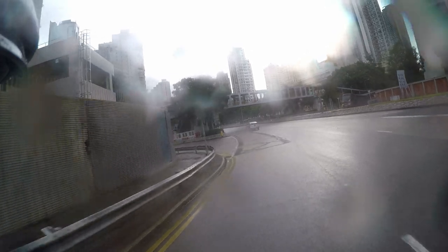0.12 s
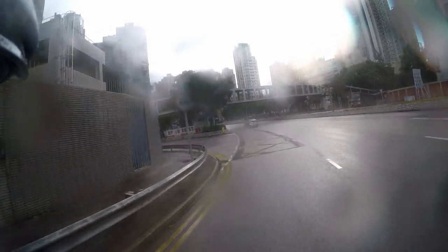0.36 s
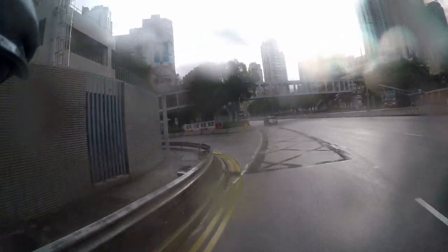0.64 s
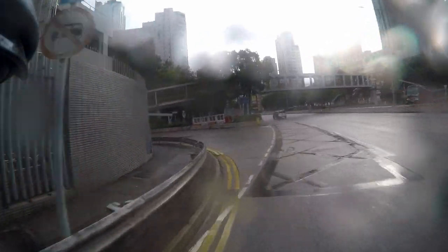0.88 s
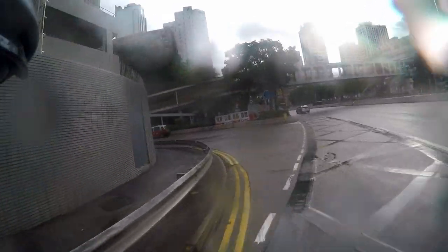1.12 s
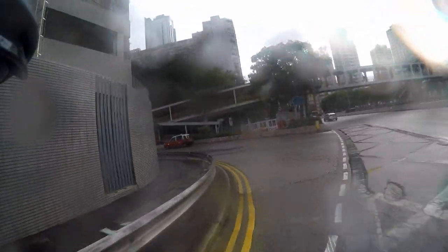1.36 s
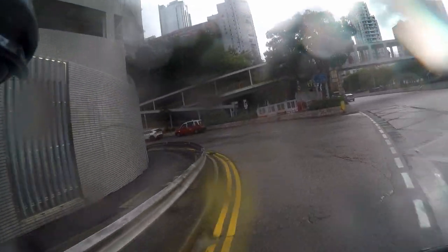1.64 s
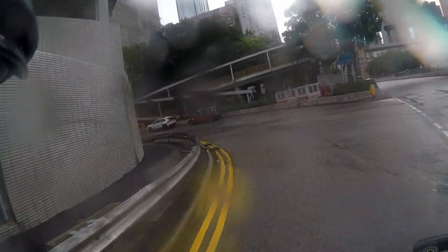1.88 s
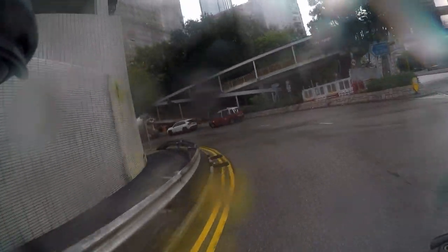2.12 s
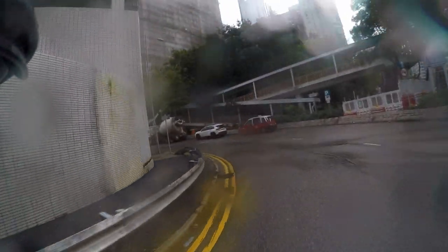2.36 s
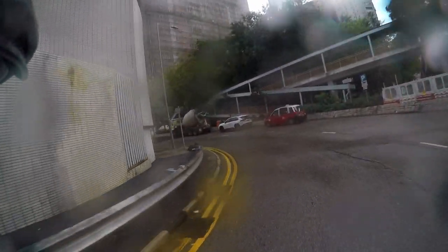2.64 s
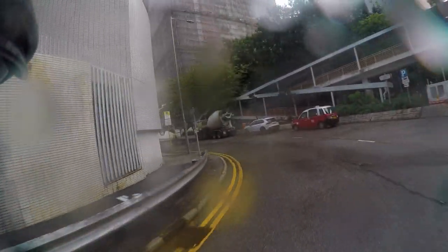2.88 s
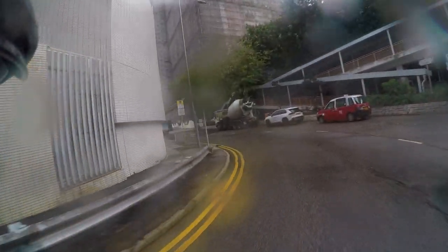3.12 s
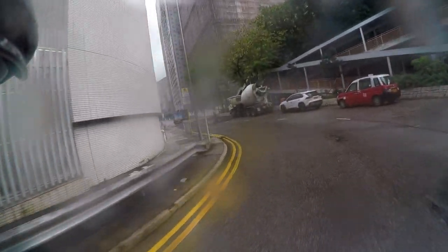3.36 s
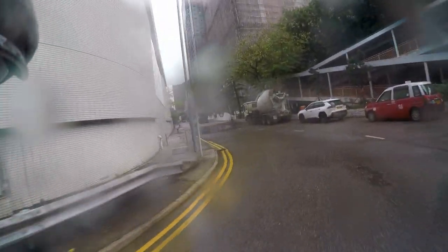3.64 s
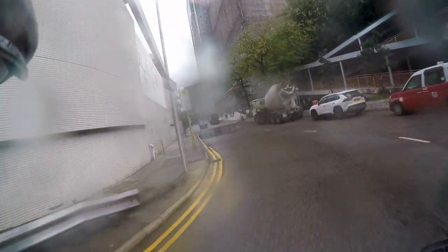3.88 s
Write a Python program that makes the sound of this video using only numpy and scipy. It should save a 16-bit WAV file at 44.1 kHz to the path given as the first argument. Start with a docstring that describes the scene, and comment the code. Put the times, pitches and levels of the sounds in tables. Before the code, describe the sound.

A scooter engine putters down a wet bend, then opens up and pulls amid tyre hiss.

```python
"""A single-cylinder scooter coasts down a wet bend, then the throttle opens and it pulls: filtered firing pulses.
Tyre spray, made of random droplets on noise, hisses through the resonances of the microphone's housing.
Coloured noise gives a steady road roar; low noise and decaying swings give wind buffeting the port.
Raindrops on the case are clicks with short rings; sparse random clicks add a faint treble crackle."""
import sys
import numpy as np
from scipy import signal
from scipy.fft import rfft, irfft
from scipy.io import wavfile

SR = 44100
rng = np.random.default_rng(int(sys.argv[2]) if len(sys.argv) > 2 else 0)


def waveform_to_disk(signal):
    """Save audio, clipped to [-1, 1], as 16-bit WAV at the path in sys.argv[1]."""
    frames = np.transpose(np.atleast_2d(signal))
    scaled = np.clip(frames, -1, 1) * 32767
    samples = np.round(scaled).astype(np.int16)
    wavfile.write(sys.argv[1], SR, samples)


def volts_from_db(level):
    """Convert decibel levels to linear amplitude ratios."""
    exponent = np.asarray(level, float) / 20
    return 10 ** exponent


N = 176400

# firing rate of the engine: (time [s], rate [firings per s])
FIRING_RATE = [(0.0, 33.5), (0.13, 32.3), (0.47, 31.95), (0.71, 31.05), (0.99, 30.71), (1.5, 29.98),
               (1.75, 29.1), (2.15, 28.51), (2.51, 28.39), (2.61, 31.52), (2.8, 35.27), (3.0, 38.2),
               (3.25, 40.14), (3.5, 40.43), (3.75, 41.36), (4.0, 40.9)]
# soft puffs on a closed throttle: (time [s], level before the extra ring [dB], extra pipe ring [dB])
COASTING = [(0, -27.5, -8.5), (.6, -27, -3), (1.2, -30, 4.5), (1.8, -29, 3.5), (2.54, -30, 2)]
# hard pulses on an open throttle: (time [s], level [dB], share of the labouring tone [0-1])
PULLING = [(2.55, -25.5, 0.89), (2.7, -24, 0.64), (2.85, -26, 0.19), (3.0, -24.5, 0.23),
           (3.25, -23.5, 0.16), (3.5, -24.5, 0.13), (4.0, -24, 0)]
# what exhaust and frame pass of a soft puff: (frequency [Hz], gain [dB])
COAST_BODY = [(20, -29), (60, -4.5), (93, 3), (125, -2), (160, -12), (185, -18), (228, -6.5), (260, -20),
              (290, -25.5), (400, -35)]
# what the exhaust passes of a hard pulse: (frequency [Hz], gain [dB])
PULL_BODY = [(40, -9), (80, -4), (125, -9), (165, -1.5), (205, -1), (245, 4), (285, -8), (328, -13.5),
             (410, -13.5), (450, -23), (495, -9.5), (570, -18), (615, -12), (655, -32.5), (705, -7.5),
             (780, -26.5), (830, -13), (900, -37.5)]
# what the exhaust passes while the engine labours at low revs: (frequency [Hz], gain [dB])
LABOUR_BODY = [(20, -38), (70, -11.5), (110, 2), (170, -1.5), (225, -6.5), (270, -10.5), (320, -10.5),
               (400, -22), (520, -39), (680, -16), (850, -44)]
# point that closes every exhaust body at the top: (frequency [Hz], gain [dB])
BODY_END = (5000, -130)
# tyre spray: (time [s], level [dB])
SPRAY = [(0.0, -31.5), (0.03, -28), (0.04, -42.5), (0.05, -31), (0.09, -41), (0.1, -28.5), (0.15, -41),
         (0.18, -32.5), (0.23, -42.5), (0.24, -32.5), (0.28, -29.5), (0.44, -40), (0.46, -35),
         (0.54, -31.5), (0.56, -44.5), (0.61, -33), (0.73, -32), (0.79, -47.5), (0.81, -32.5), (0.82, -48),
         (0.93, -55), (1.07, -43.5), (1.09, -33), (1.19, -29), (1.41, -34), (1.43, -29.5), (1.82, -31.5),
         (1.86, -35), (3.12, -34.5), (3.17, -40.5), (3.25, -34.5), (3.39, -39), (3.6, -35.5), (4.0, -39.5)]
# tone of the spray before the housing: (frequency [Hz], relative density [dB per Hz])
SPRAY_COLOUR = [(410, -59), (700, -7.5), (1060, -13.5), (2050, -4.5), (2770, -1), (3190, -0.5),
                (4130, -10.5), (5290, -23), (7310, -21.5), (8110, -36), (15500, -72)]
# lower splash in deeper water: (time [s], level relative to the spray [dB])
SPLASH = [(0, -7), (.3, -4), (.5, 2), (.6, -9.5), (1.1, -45), (1.8, -13), (2.1, -3.5), (2.6, -9.5),
          (4, -0.5)]
# tone of the splash before the housing: (frequency [Hz], relative density [dB per Hz])
SPLASH_COLOUR = [(400, -8), (800, 2.5), (1150, 1.5), (1600, 0), (2100, 1), (3000, -31.5)]
# resonances of the microphone's housing: (centre [Hz], width [Hz], lift at a housing share of 1 [dB])
HOUSING = [(1188, 93, 6), (1648, 460, 6), (2405, 277, 9.5), (3173, 220, 9.5), (3655, 57, 9.5),
           (4090, 390, 9), (6080, 340, 5.5)]
# tone of the road roar before the housing: (frequency [Hz], relative density [dB per Hz])
ROAD_COLOUR = [(150, -1), (250, -6), (313, -9), (614, -10), (1070, -13), (3220, -20), (4300, -27),
               (5300, -30.5), (6300, -27), (8500, -35), (9600, -41.5), (10600, -38), (11600, -43.5),
               (15500, -46)]
# wind rumble on the port: (time [s], level [dB])
WIND = [(0.0, -29.5), (.4, -29.5), (.53, -25.5), (.75, -35), (.92, -25.5), (1.12, -31.5), (1.32, -23.5),
        (1.6, -21.5), (1.88, -22), (2.1, -30.5), (3.15, -28.5), (3.8, -27.5), (4.0, -33.5)]
# hard wind buffets: (time [s], strength before decay and smoothing [dB], swing [Hz], push +1 or pull -1)
BUFFETS = [(1.918, -15, 25, -1), (2.0, -5.5, 26.4, -1), (2.142, -8.5, 19, 1), (2.169, -3.5, 29.8, -1),
           (2.237, -18, 19, -1)]
# raindrops on the case: (time [s], ring strength before decay and low cut [dB], ring pitch [Hz])
RAINDROPS = [(.0568, -32, 5200), (.1301, -41, 10500), (.2354, -37, 8000), (.2618, -37, 8500),
             (.745, -46, 10000), (1.2338, -26, 8800), (1.2345, -32, 10800), (1.46, -44, 10500),
             (1.6327, -39, 8500), (2.5538, -35, 11500), (2.5542, -27, 4400), (2.9382, -37, 10800),
             (3.1183, -33, 7500), (3.6257, -45, 9000), (3.6785, -39, 9000), (3.7245, -44, 7000)]


def rms_one(x):
    """Scale to unit rms."""
    return x / np.sqrt(np.mean(x ** 2) + 1e-20)


def in_time(rows, axis=1):
    """Draw one column of a table as a line through every sample."""
    rows = np.array(rows)
    return np.interp(np.arange(N) / SR, rows[:, 0], rows[:, axis])


def drift(rate_hz):
    """Slow random wander of unit rms: noise through two equal poles at rate_hz, run at SR / 40."""
    pole = np.exp(-80 * np.pi * rate_hz / SR)
    noise = rng.standard_normal(N // 40 + 2002)
    slow = signal.lfilter([1], [1, -2 * pole, pole * pole], noise)[2000:]  # skip the filter's start
    return np.interp(np.arange(N) / 40, np.arange(len(slow)), rms_one(slow))


def ring(clicks, hz, t60_s):
    """Two-pole resonator: each click sets off a decaying sine, of height 1 before decay for a unit click."""
    pole = volts_from_db(-60 / (t60_s * SR))
    step = 2 * np.pi * hz / SR
    feedback = [1, -2 * pole * np.cos(step), pole * pole]
    return signal.lfilter([0, np.sin(step)], feedback, clicks + 1e-18)


def colour(x, spectrum, housing_share):
    """Shape by a spectrum, lifted at the housing's resonances; rms 1."""
    hz = np.arange(N // 2 + 1) * SR / N + 1
    points = np.array(spectrum)
    lift_db = sum(db / (1 + (2 * (hz - centre) / width) ** 2) for centre, width, db in HOUSING)
    tone_db = np.interp(np.log(hz), np.log(points[:, 0]), points[:, 1])
    return rms_one(irfft(rfft(x) * volts_from_db(tone_db + housing_share * lift_db), N))


def firing_cycles():
    """Add up the firing rate into a count of cycles, and find the sample where the throttle opens."""
    throttle_opens_s = 2.545
    cycles = np.cumsum(in_time(FIRING_RATE)) / SR
    opens = int(throttle_opens_s * SR)
    cycles = cycles - cycles[opens] - .265  # the count stands at -0.265 as the throttle opens
    return cycles, opens


def firing_samples(cycles):
    """The cylinder fires whenever the count passes a whole number."""
    return np.flatnonzero(np.diff(np.floor(cycles)) > 0)


def exhaust(firings, jitter_s, bodies):
    """One uneven pulse per firing and its pipe-end echo pass causal body filters; each output has rms 1."""
    firing_spread_db = .5
    pipe_echo_s = 0.00916
    muffler_lag_s, muffler_hz = 0.0019, 394
    chance = rng.standard_normal((len(firings), 2))
    places = firings + (chance[:, 0] * jitter_s * SR).astype(int)
    clicks = np.zeros(N + SR)
    clicks[np.clip(places, 0, N - 1)] = volts_from_db(firing_spread_db * chance[:, 1])
    hz = np.arange((N + SR) // 2 + 1) * SR / (N + SR) + 1
    # the lows leave the muffler later than the highs
    lag = np.exp(-2j * np.pi * muffler_lag_s * muffler_hz * np.arctan(hz / muffler_hz))
    outs = []
    for body, echo_db in bodies:
        points = np.array(body + [BODY_END])
        body_db = np.interp(np.log(hz), np.log(points[:, 0]), points[:, 1])
        # folding the cepstrum makes the filter minimum-phase: no sound ahead of the pulse
        cepstrum = irfft(body_db * np.log(10) / 20)
        cepstrum[1:len(hz) - 1] *= 2
        cepstrum[len(hz):] = 0
        echo = 1 + volts_from_db(echo_db) * np.exp(-2j * np.pi * hz * pipe_echo_s)
        out = irfft(rfft(clicks) * np.exp(rfft(cepstrum)) * lag * echo)[:N]
        outs.append(out / np.std(out[firings[0]:firings[-1]]))
    return outs


def coasting(cycles, opens):
    """Closed throttle: soft exhaust puffs whose upper part rings more or less strongly in the pipe."""
    jitter_s, echo_db, split_hz = .00015, -21, 190
    firings = firing_samples(cycles)
    puffs, = exhaust(firings[firings < opens], jitter_s, [(COAST_BODY, echo_db)])
    upper = signal.butter(4, split_hz, "high", fs=SR, output="sos")
    pipe_ring = signal.sosfiltfilt(upper, puffs)
    extra_ring = volts_from_db(in_time(COASTING, axis=2)) - 1
    return volts_from_db(in_time(COASTING)) * (puffs + extra_ring * pipe_ring)


def gear_whine(cycles, opens):
    """A faint sine at 20 cycles per firing, wavering in level, until the throttle opens."""
    level = volts_from_db(-53 + 2.0 * drift(14))
    return level * np.sin(2 * np.pi * 20 * cycles) * (np.arange(N) < opens)


def splash():
    """Deeper water: noise with a lower tone, wavering in level."""
    tone = colour(rng.standard_normal(N), SPLASH_COLOUR, housing_share=1.95)
    return volts_from_db(in_time(SPLASH) + 2.54 * drift(4.3)) * tone


def spray():
    """Tyre spray: dense droplets of uneven size on smooth hiss, fluttering a little, joined by the splash."""
    droplets_per_s, spread_db = 3500, 3
    droplet_share = 0.41  # of the power, before colouring
    sizes = volts_from_db(spread_db * np.minimum(rng.exponential(1, N), 5)) * rng.choice([-1, 1], N)
    droplets = rms_one(sizes * (rng.random(N) < droplets_per_s / SR))
    hiss = rng.standard_normal(N)
    source = np.sqrt(droplet_share) * droplets + np.sqrt(1 - droplet_share) * hiss
    level = volts_from_db(in_time(SPRAY) + 1.09 * drift(40))
    return level * (colour(source, SPRAY_COLOUR, housing_share=0.82) + splash())


def road():
    """Steady roar of road and traffic: coloured noise with a very slight waver."""
    return volts_from_db(-39 + 0.27 * drift(17)) * colour(rng.standard_normal(N), ROAD_COLOUR, housing_share=0.59)


def wind():
    """Wind on the port: a band of very low noise, lumpy in level."""
    low_hz, high_hz = 8.1, 29.2
    lump_db, lump_rate_hz = 2.5, 5
    band = signal.butter(2, [low_hz, high_hz], "band", fs=SR, output="sos")
    rumble = rms_one(signal.sosfilt(band, rng.standard_normal(N + SR))[SR:])
    return volts_from_db(in_time(WIND) + lump_db * drift(lump_rate_hz)) * rumble


def thin(x):
    """Cut the lows below 3 kHz, which leaves clicks thin and bright."""
    return signal.sosfilt(signal.butter(2, 3000, "high", fs=SR, output="sos"), x)


def treble_crackle():
    """Faint sparse treble crackle: single clicks of uneven strength at random moments."""
    per_s, least_db, spread_db = 40, -56, 3  # strength before the low cut
    strength = volts_from_db(least_db + spread_db * np.minimum(rng.exponential(1, N), 3))
    return thin(strength * (rng.random(N) < per_s / SR))


def raindrops():
    """Each drop on the case is a bright crack and a very short ring."""
    t60_s, crack_db = .002, 10  # the crack's click is stronger than the one that starts the ring
    out = np.zeros(N)
    for s, db, hz in RAINDROPS:
        click = np.zeros(N)
        click[int(s * SR)] = volts_from_db(db)
        out += volts_from_db(crack_db) * click + ring(click, hz, t60_s)
    return thin(out)


def buffets():
    """Hard buffets push or pull the diaphragm, which swings back and dies away; one pole softens the onset."""
    t60_s = 0.18
    out = np.zeros(N)
    for s, db, hz, way in BUFFETS:
        push = np.zeros(N)
        push[int(s * SR)] = way * volts_from_db(db)
        out += signal.lfilter([.015], [1, -.985], ring(push, hz, t60_s))
    return out


def pulling(cycles, opens):
    """Open throttle: hard exhaust pulses, crossfading from a boomy labouring tone as the revs rise."""
    jitter_s, labour_echo_db, free_echo_db = .00006, -7, -11
    firings = firing_samples(cycles)
    bodies = [(LABOUR_BODY, labour_echo_db), (PULL_BODY, free_echo_db)]
    labour, free = exhaust(firings[firings >= opens], jitter_s, bodies)
    share = in_time(PULLING, axis=2)
    return volts_from_db(in_time(PULLING)) * (share * labour + (1 - share) * free)


def scene():
    """Everything reaches the one microphone."""
    cycles, opens = firing_cycles()
    engine = coasting(cycles, opens) + gear_whine(cycles, opens) + pulling(cycles, opens)
    air = wind() + buffets()
    ticks = treble_crackle() + raindrops()
    return (engine + spray() + road() + air + ticks)[None]


def top_cut(x):
    """Nothing passes above the cut-off."""
    return signal.sosfilt(signal.butter(12, 15720, fs=SR, output="sos"), x)


def record(dry):
    """Cut the lowest rumble, and band-limit the sound steeply at 15450 Hz."""
    low = signal.butter(1, 5.7, "high", fs=SR, output="sos")
    top = signal.cheby2(20, 40, 15450, fs=SR, output="sos")  # 40 dB down from 15450 Hz up
    mix = signal.sosfilt(np.vstack([low, top]), dry)
    return top_cut(mix)


dry = scene()
out = record(dry)
waveform_to_disk(out)
```